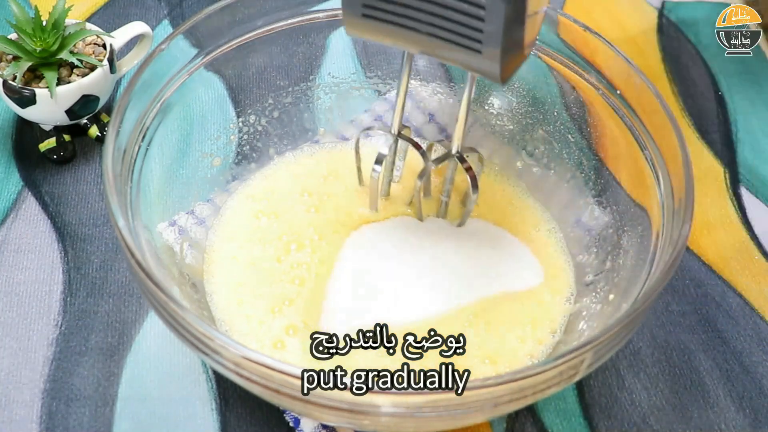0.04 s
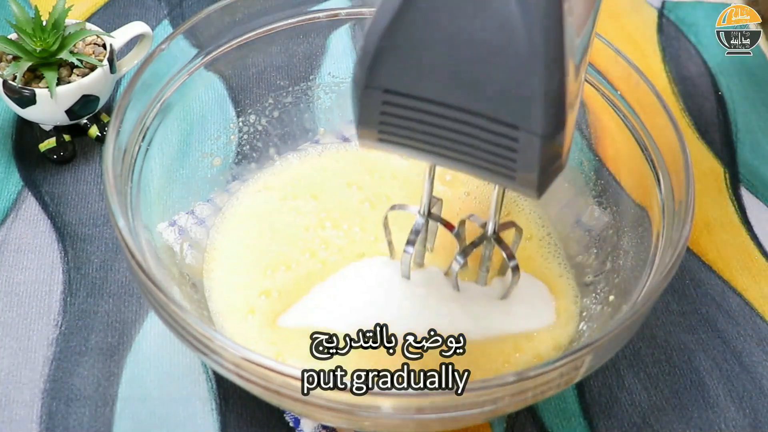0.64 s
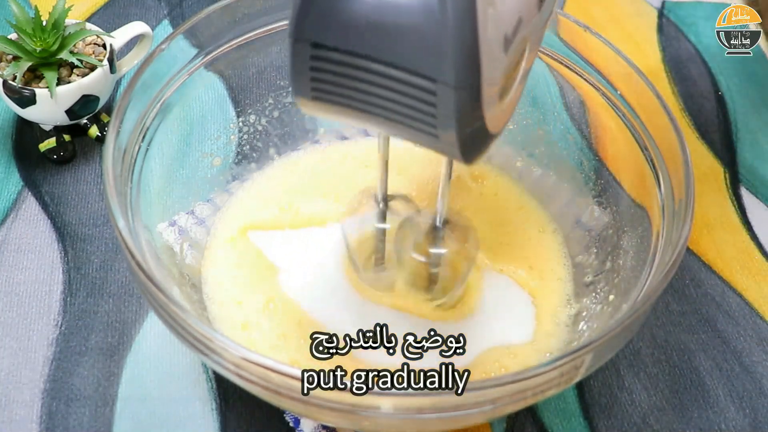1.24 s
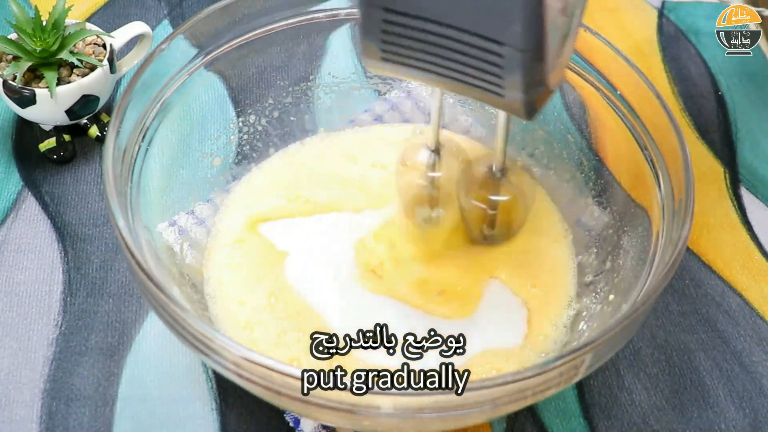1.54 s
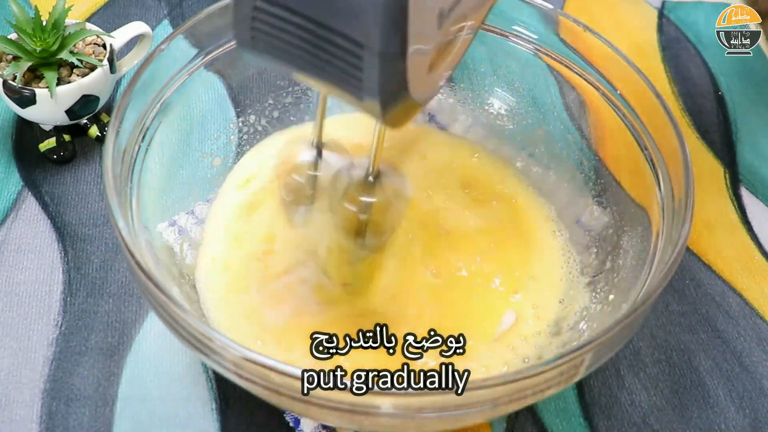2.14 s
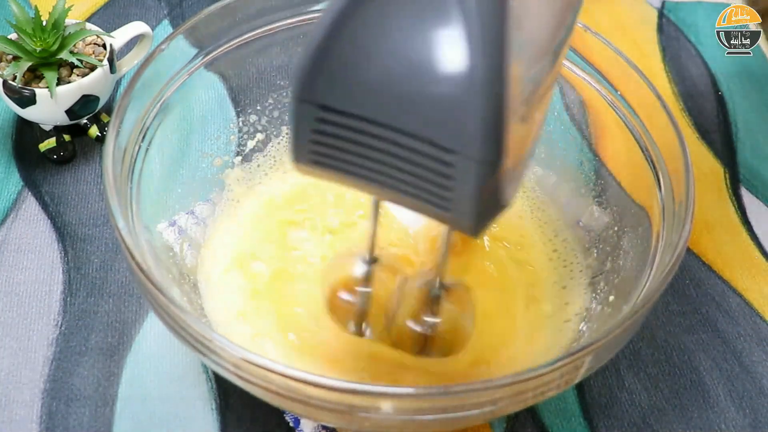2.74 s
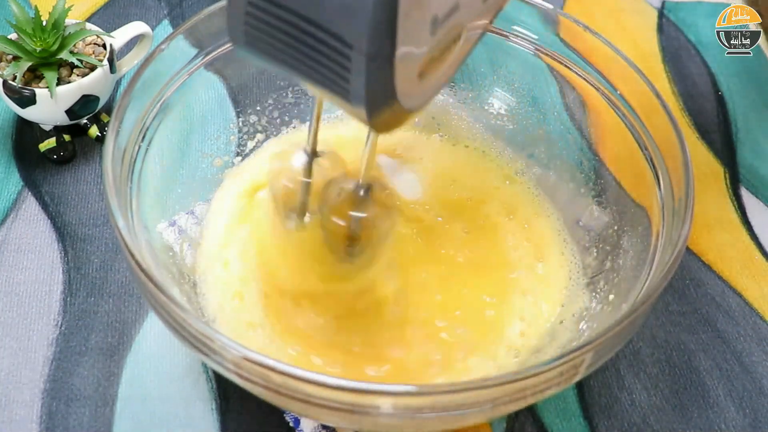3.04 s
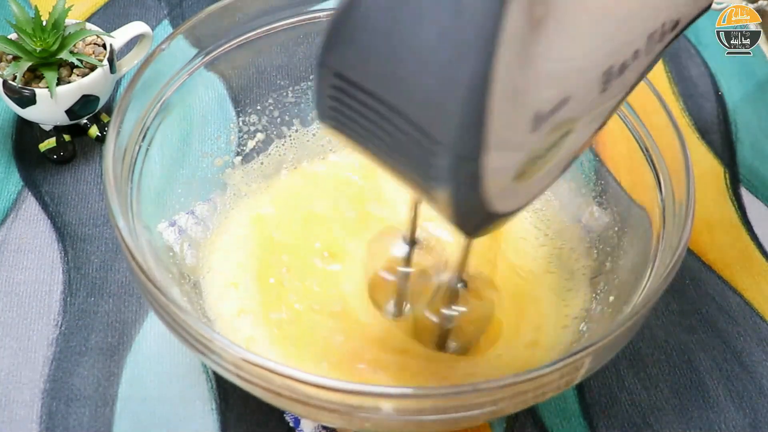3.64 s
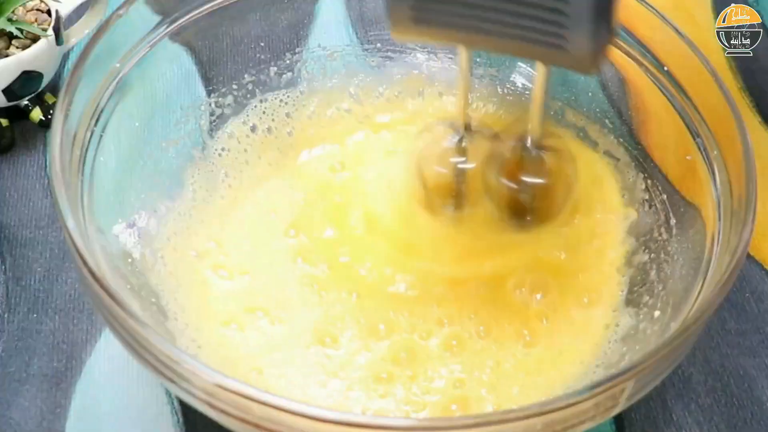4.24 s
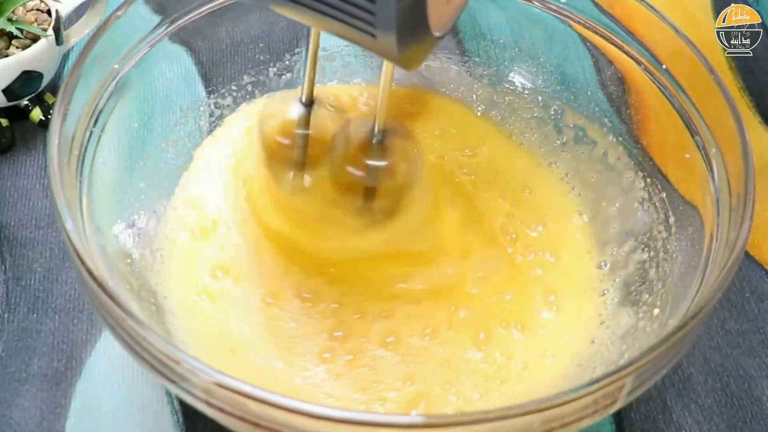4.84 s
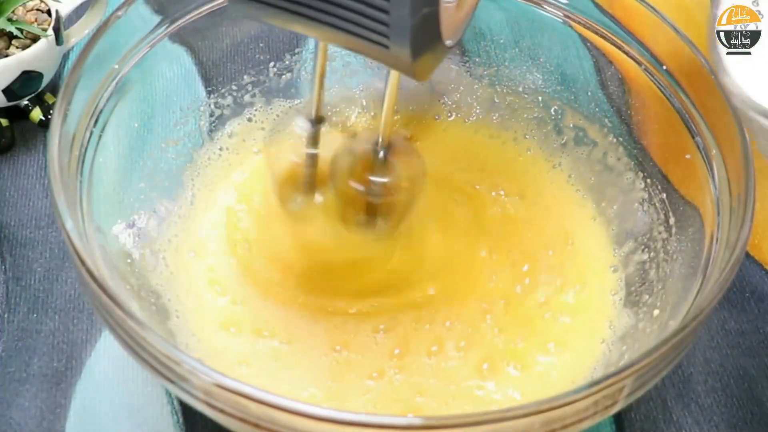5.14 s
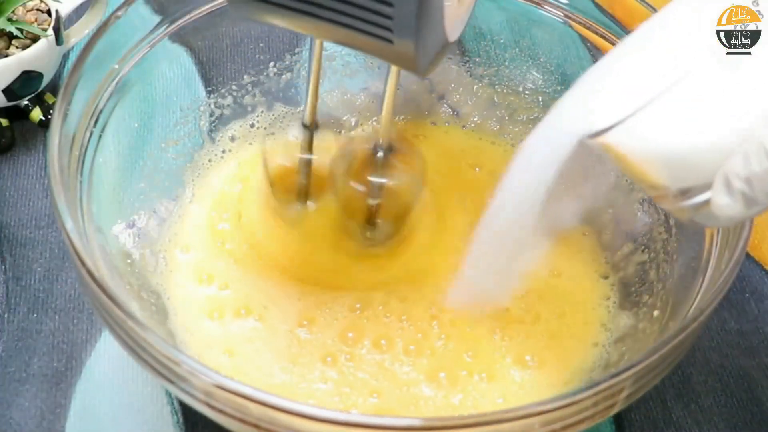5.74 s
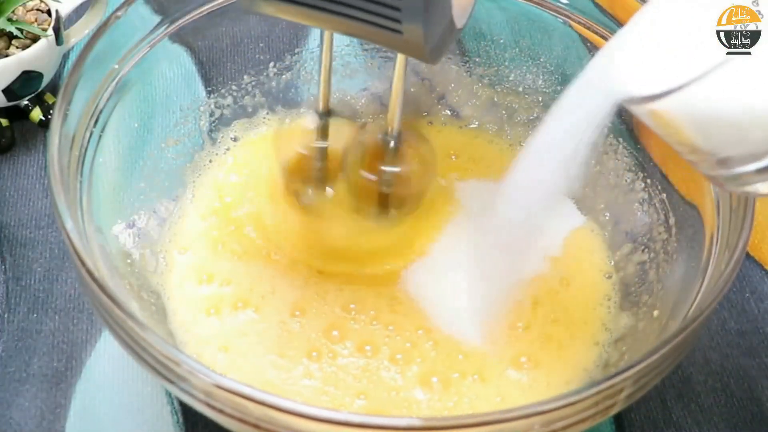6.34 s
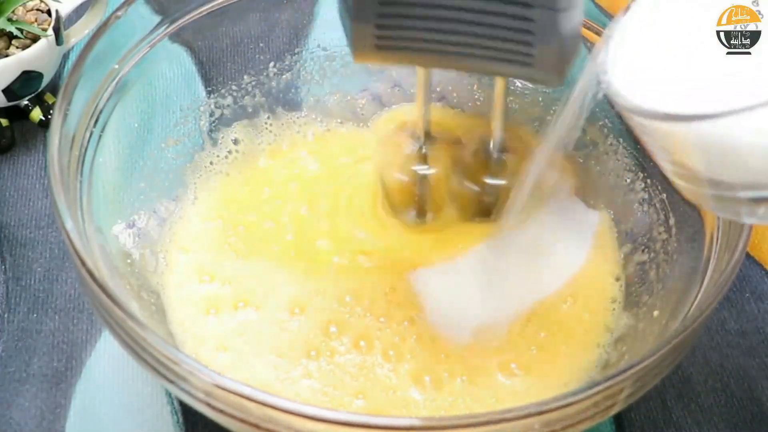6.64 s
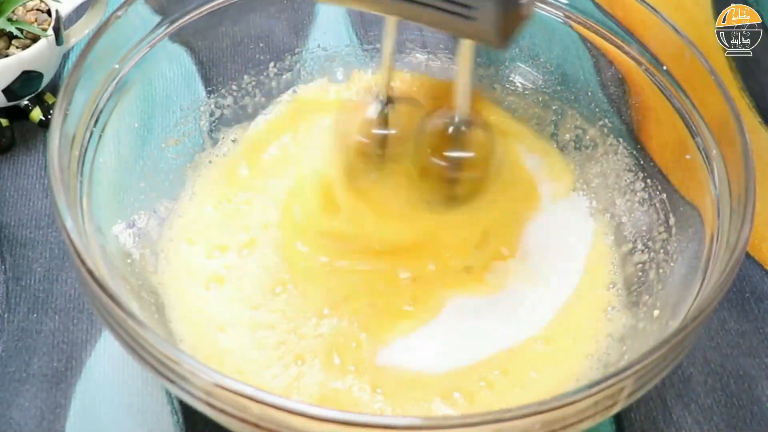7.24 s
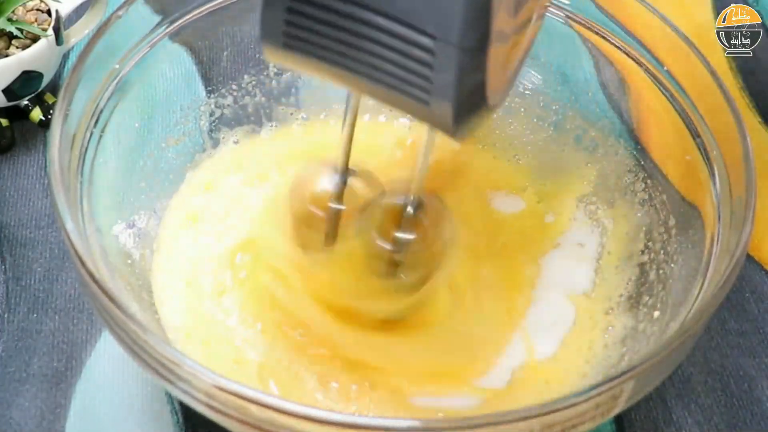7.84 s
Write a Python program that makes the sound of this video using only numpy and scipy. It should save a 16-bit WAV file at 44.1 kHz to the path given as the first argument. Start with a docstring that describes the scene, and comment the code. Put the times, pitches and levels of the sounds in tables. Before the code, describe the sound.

For the first second, a hand makes faint bumps and small clicks on the plastic grip of an electric hand mixer. At about 1.1 seconds the switch snaps on, and the motor growls and rises in pitch, reaching full speed by about 2 seconds. It then runs steadily to the end at around 8 seconds, a whine and hum over rattling gears, with a light spatter of eggs and sugar. The tone wavers slightly as the beaters circle the glass bowl. A light knock comes at 3.6 seconds. From 4.2 to 5 seconds the steel beaters scrape and knock the glass in quick, louder clusters. Another knock follows at 5.7 seconds, a few softer ones between 6.1 and 6.4, and two more near 7.5. The sound is close, with the short echo of a small, quiet kitchen.

```python
"""Hand mixer in a glass bowl.

A hand bumps and clicks on the plastic grip, then the switch snaps on. The motor growls and whines
up to speed, its gears rattle in the housing and the beaters spatter eggs and sugar.
Now and then the steel blades graze or knock the glass. A small kitchen adds a short tail."""
import sys
import numpy as np
from scipy import signal
from scipy.fft import rfft, irfft
from scipy.io import wavfile
from scipy.ndimage import uniform_filter1d

SR = 44100
rng = np.random.default_rng(int(sys.argv[2]) if len(sys.argv) > 2 else 0)


def inscribe(sig):
    """Save sig as 16-bit PCM at rate SR to the path in sys.argv[1].

    A 1-D sig is mono; a 2-D sig holds one channel per row.
    Samples are clipped to [-1, 1] before scaling.
    """
    pcm = np.round(np.clip(np.atleast_2d(sig).T, -1, 1) * 32767)
    wavfile.write(sys.argv[1], SR, pcm.astype(np.int16))


N = 357210
TIME = np.arange(N) / SR
FREQS_HZ = np.fft.rfftfreq(8192, 1 / SR)

# still kitchen: freq_hz, gain_db
ROOM_EQ = [(30, -9), (55, -3), (100, -5), (300, -9), (520, -15), (660, 11), (800, -16), (1700, -13),
           (3000, -17), (5000, -28), (15000, -30)]
# wall reflections: freq_hz, gain_db
WALL_EQ = [(400, -9), (780, -7), (1200, -1), (3000, -1.5), (12000, -9.0)]

# palm on the casing: start_s, peak_db, pitch_hz, rattle_db
BUMPS = [(0.003, -56, 630, -10), (0.036, -60, 395, -14), (0.170, -53, 457, -13), (0.190, -47, 593, -10),
         (0.234, -55, 646, -7), (0.247, -60, 567, -16), (0.263, -62, 500, -2), (0.360, -62, 620, -11),
         (0.386, -56, 500, -14), (0.766, -50, 683, -11)]
# hollow casing: freq_hz, gain_db
CASING_EQ = [(80, -24), (260, -2), (650, 0), (900, -15), (3000, -39)]
# grip and switch: start_s, level_db, bass_db, treble_db, spot_hz
CLICKS = [(0.037, -46, -17, -16, 2750), (0.194, -47, -17, -26, 3150), (0.528, -49.5, -30, -40, 1050),
          (0.675, -40.5, -52, -28, 1800), (0.683, -40, -47, -15, 1000), (0.791, -38, -40, -31, 2100),
          (0.862, -31, -42, -14, 1750), (0.913, -32, -33, -18, 1800), (1.003, -31.5, -48, -13, 1700),
          (1.116, -34, -29.5, -10, 2230), (1.128, -13, -40.5, -4.5, 1910)]
# tapped plastic grip: freq_hz, gain_db
GRIP_EQ = [(60, -35), (200, -21), (400, -18), (640, 1.5), (830, -4), (1400, -4), (1900, 1.5), (2500, -2),
           (3200, -4), (4200, -10), (8000, -17.5), (15000, -38)]
# grip cavities: freq_hz, width_hz, gain_db
GRIP_MODES = [(409, 80, 3), (680, 55, 9.5), (1070, 100, 9), (1680, 150, 4), (2020, 80, 1), (3060, 350, 6)]

# shaft speed under batter drag, before spin-up scaling: time_s, speed_hz
SHAFT_SPEED = [(2.7, 391.2), (3.35, 386.7), (3.85, 390.4), (4.2, 384.4), (4.35, 381), (4.65, 384.2),
               (4.9, 383.3), (5.0, 383), (5.45, 381.4), (5.75, 384), (6.75, 382.3), (7.65, 378.6),
               (8.1, 379)]
# imbalance hum as the mixer tilts: time_s, level_db
HUM_LEVEL = [(1.9, -42.5), (2.15, -44), (2.4, -37.5), (2.55, -37), (3.25, -40.5), (3.35, -38), (4.2, -42.5),
             (4.8, -43.5), (5.05, -43.5), (5.3, -40), (6.1, -43.5), (6.6, -39), (7.05, -45.5), (7.5, -39),
             (7.8, -51.5), (8.1, -41)]
# twelve armature slots: shaft_order, level_db
SLOT_TONES = [(12, 2.5), (24, -6), (36, -13)]
# slot whine as the mixer moves: time_s, level_db
WHINE_LEVEL = [(1.85, -56), (2.02, -47.5), (2.22, -44), (2.35, -55), (2.6, -43), (2.71, -50), (2.96, -45),
               (3.19, -52), (3.38, -45), (3.8, -47), (3.94, -54), (4.05, -50), (4.3, -51), (4.75, -47),
               (5.08, -55), (5.28, -47), (5.43, -58), (5.67, -54), (6.05, -49.5), (6.48, -59), (6.8, -49),
               (7.08, -44), (7.22, -49), (7.35, -47), (7.61, -56), (7.8, -49), (8.1, -53)]
# whine path through the stator: freq_hz, gain_db
STATOR_EQ = [(60, -30), (300, -2), (650, 10), (900, 12), (1200, 17), (1550, 14), (2000, 16.5), (2300, 11),
             (2550, 4), (2850, 21), (3200, 14), (3500, -4), (4300, -14), (4520, 0), (4750, 0), (5200, -20)]
# brushes on the commutator: shaft_order, level_db
BRUSH_TONES = [(24, -53.5), (36, -63)]
# whistle path through the vents: freq_hz, gain_db
VENT_EQ = [(60, -60), (4000, -35), (5000, -2), (7300, 0), (7900, -8), (8600, -1), (9300, -1), (10300, -13),
           (11000, 0), (12500, 2), (13900, -3)]
# casing under inrush current: freq_hz, gain_db
GROWL_EQ = [(80, -54), (350, -30), (600, -8), (900, -1), (3000, -13), (6000, -45)]
# rotor and fan: shaft_order, level_db
ROTOR_TONES = [(2, -43.5), (3, -55), (4, -49.5), (5, -56.5), (6, -55), (8, -56), (9, -44.5), (18, -50.5),
               (20, -52), (21, -50)]
# beater effort: time_s, rattle_db, relative_treble_db
EFFORT = [(1.7, -25, -11.5), (1.8, -26.0, -12), (2.1, -24.0, -11), (4.05, -24, -11.5), (4.3, -23, -12),
          (4.85, -24.5, -9), (5.0, -23, -11), (5.3, -23.5, -11), (5.7, -23, -11.5), (5.85, -25.5, -10),
          (6.35, -23.0, -11.5), (6.6, -25.5, -8.5), (7.45, -23.5, -11), (8.1, -25, -9.5)]
# mixer housing: freq_hz, gain_db
HOUSING_EQ = [(30, -39), (100, -43), (150, -25.5), (250, -13), (450, -6), (900, -4.5), (1350, -6),
              (1900, -4), (3100, -6.5), (3650, -17.5), (4200, -24), (5500, -16), (9000, -15), (11000, -24),
              (15500, -32.5)]
# housing and bowl resonances: freq_hz, width_hz, gain_db
HOUSING_MODES = [(218, 97, 5.5), (442, 37, 3.5), (546.6, 26, 6), (648, 117, 8), (815, 62, 4),
                 (1035, 49, 8.5), (1596, 72, 6.5), (1866, 230, 4.5), (2060, 63, -7), (2270, 190, 1.5),
                 (2793, 180, 4.5), (3054, 177, 6.5), (5220, 1160, 5.5), (5830, 440, -5), (6350, 300, 0.5),
                 (7900, 400, 0), (9600, 300, 1.5), (10350, 250, 2), (10800, 400, -1), (12150, 300, 3.5)]
# batter drops: freq_hz, gain_db
SPATTER_EQ = [(200, -59), (700, -7.0), (2800, -17), (4200, -36.5), (8000, -20), (15000, -40)]
# rotor overtones crossing a housing resonance: shaft_order, level_db
SWEEP_TONES = [(8, -26.5), (9, -31.5)]

# beaters passing the bowl's near side: middle_s, level_db
PASSES = [(2.05, -7), (2.9, -5), (3.8, -9), (4.55, -7), (7.02, -2), (7.78, -3.5)]
# near-side resonances: freq_hz, width_hz, level_db
NEAR_BANDS = [(655, 67, -38.5), (2060, 98, -32.5), (2620, 120, -32)]
# far-side resonances, and the brushes' hiss near 9.3 kHz while the mixer rests:
# freq_hz, width_hz, level_db
FAR_BANDS = [(990, 43, -59), (1568, 99, -39), (2780, 28, -38), (9310, 230, -45.5), (11400, 200, -59),
             (12130, 330, -58), (13060, 180, -63)]
# blades grazing the glass: middle_s, length_s, level_db
SCRAPES = [(3.569, 0.13, -44), (4.267, 0.51, -31.5), (4.98, 0.25, -35.5), (6.33, .25, -45)]
# steel ticks: freq_hz, gain_db
STEEL_EQ = [(3000, -40), (6000, -15), (7800, 5), (10000, -8), (15000, -24)]
# filled glass bowl with beaters: freq_hz, gain_db, t60_s
BOWL_MODES = [(455, 13.5, 0.046), (650, 13, 0.044), (1056, 10.5, 0.065), (1570, 1, 0.078),
              (1890, 5.5, 0.083), (2275, 1, .05), (2910, 9, 0.071), (7550, 4.5, 0.026)]
# blades striking the glass: start_s, level_db, treble_db, spot_hz
KNOCKS = [(3.569, -19, -32, 650), (4.189, -12, -16, 2900), (4.22, -12, -19, 650), (4.256, -8, -14, 2900),
          (4.311, -9.5, -13, 2900), (4.364, -6, -15, 2400), (4.417, -15, -16, 460), (4.666, -17, -18, 1900),
          (4.927, -8.5, -20, 1900), (4.982, -6, -20, 2900), (5.034, -9.5, -30, 1050),
          (5.671, -13, -18, 1044), (6.131, -13, -33, 1555), (6.24, -22, -24, 1900), (6.34, -15, -24, 460),
          (6.42, -17.5, -24, 1560), (7.445, -5.5, -25, 1050), (7.513, -13, -16, 2900)]

MAINS_HZ, TOP_HZ = 50, 15700
POWER_ON_S, ROTOR_START_S = 1.13, 1.14
REST_S, REST_LENGTH_S = 5.97, 2.3  # middle and length of the rest at the bowl's far side


def undb(db):
    """Decibels to gain."""
    return 10 ** (np.asarray(db) / 20)


def unit(x):
    """Scale to rms 1."""
    return x / np.sqrt(np.mean(x ** 2))


def curves(table):
    """Each column, interpolated over time."""
    time_s, *columns = np.transpose(table)
    return [np.interp(TIME, time_s, column) for column in columns]


def walk(rate_hz):
    """Smooth random drift, rms 1."""
    step = max(int(SR / rate_hz), 1)
    held = np.repeat(rng.standard_normal(N // step + 1), step)
    return unit(uniform_filter1d(held, step)[:N])


def colour(x, eq, peaks=()):
    """Minimum-phase filter: broad outline plus resonant peaks."""
    hz, db = np.transpose(eq)
    gain_db = np.interp(np.log(FREQS_HZ + 1), np.log(hz), db)
    for centre_hz, width_hz, lift_db in peaks:
        gain_db = gain_db + lift_db / (1 + (2 * (FREQS_HZ - centre_hz) / width_hz) ** 2)
    cepstrum = irfft(np.log(undb(gain_db)))
    half = len(cepstrum) // 2
    cepstrum[1:half] *= 2
    cepstrum[half + 1:] = 0
    return signal.fftconvolve(x, irfft(np.exp(rfft(cepstrum))))[:len(x)]


def band(x, hz, kind):
    """Low-pass or high-pass."""
    return signal.sosfilt(signal.butter(4, hz, kind, fs=SR, output="sos"), x)


def resonate(x, hz, width_hz):
    """Narrow band-pass."""
    edges_hz = [hz - width_hz / 2, hz + width_hz / 2]
    return signal.sosfilt(signal.butter(2, edges_hz, "band", fs=SR, output="sos"), x)


def fade(t, t60_s):
    """Exponential decay."""
    return np.exp(-np.log(1000) * t / t60_s)


def impacts(rate_hz, spread_db):
    """Random impulses of uneven size, rms 1."""
    hits = (rng.random(N) < rate_hz / SR) * rng.choice([-1, 1], N)
    return unit(hits * undb(spread_db * np.minimum(rng.standard_normal(N), 2)))


def add(out, start_s, sound):
    """Mix a sound in at start_s."""
    i = max(int(start_s * SR), 0)
    out[i:i + len(sound)] += sound[:N - i]


def swell(middle_s, length_s):
    """Smooth rise, hold and fall, 0 to 1."""
    out = np.zeros(N)
    add(out, middle_s - length_s / 2, signal.windows.tukey(int(length_s * SR), .7))
    return out


def tones(partials, turns, waver_db):
    """Shaft-locked partials, each wavering as the mixer moves."""
    return sum(np.sqrt(2) * undb(db + waver_db * walk(8.1))
               * np.sin(2 * np.pi * (order * turns + rng.random())) for order, db in partials)


def bumps():
    """Palm on the hollow casing: slow push, one low ring, some plastic rattle."""
    out, t = np.zeros(N), TIME[:SR // 4]
    for start_s, peak_db, pitch_hz, rattle_db in BUMPS:
        push = np.minimum(t / .005, 1) ** 2 * (fade(t, 0.039) + undb(-20) * fade(t, .25))
        noise = rng.standard_normal(len(t))
        hollow = np.sin(2 * np.pi * pitch_hz * t) + undb(-12) * unit(colour(noise, CASING_EQ))
        rattle = unit(band(colour(noise, GRIP_EQ, GRIP_MODES), 3400, "low"))
        bump = push * (hollow + undb(rattle_db) * rattle)
        add(out, start_s, undb(peak_db) * bump / np.abs(bump).max())
    return out


def clicks():
    """Fingers shift on the grip, then the switch snaps; each spot has its own resonance."""
    out, t = np.zeros(N), TIME[:SR // 3]
    decay = fade(t, 0.016) + undb(-21.5) * fade(t, 0.3)
    for start_s, level_db, bass_db, treble_db, spot_hz in CLICKS:
        contact_s = 0.0016 * undb(-.3 * min(treble_db + 5.0, 0))  # soft fingers press in slowly
        push = rng.standard_normal(len(t)) * decay * np.minimum(t / contact_s, 1)
        ring = colour(push, GRIP_EQ, GRIP_MODES + [(spot_hz, 300, 6)])
        thud, tick = unit(band(ring, 460, "low")), unit(band(ring, 4800, "high"))
        body = unit(band(band(ring, 620, "high"), 3100, "low"))
        click = body + undb(bass_db + 15) * thud + undb(treble_db - 1.0) * tick
        add(out, start_s, undb(level_db - 2.5) * click / np.abs(click).max())
    return out


def spin_up(kick_share=.085, kick_s=.035, rise_s=.241):
    """Share of full speed: quick inrush kick, then a slower exponential approach."""
    t = np.maximum(TIME - ROTOR_START_S, 0)
    return 1 - kick_share * np.exp(-t / kick_s) - (1 - kick_share) * np.exp(-t / rise_s)


def shaft(shaft_hz, jitter):
    """Accumulated turns of the shaft, trembling in its bearings."""
    return np.cumsum(shaft_hz * (1 + 0.000786 * walk(14) + jitter * walk(400))) / SR


def motor(shaft_hz, turns, ripple, inrush):
    """Imbalance hums, slots whine, brushes whistle; inrush roughens the last two and adds a growl."""
    hum_db, whine_db = curves(HUM_LEVEL)[0], curves(WHINE_LEVEL)[0]
    speed = shaft_hz / shaft_hz.max()
    hum = tones([(1, 2)], turns, waver_db=1.2) * undb(hum_db) * speed ** 5

    shudder = (1 + (0.3 + 0.68 * inrush) * ripple) * undb(1.2 * inrush * walk(300))
    judder_turns = .008 * inrush * walk(500)  # a slow rotor steps unevenly from slot to slot
    slots = tones(SLOT_TONES, turns + judder_turns, waver_db=1.15) * shudder
    whine = colour(slots, STATOR_EQ) * undb(whine_db + 8 * inrush) * np.minimum(speed / 0.24, 1)

    brushes = tones(BRUSH_TONES, shaft(shaft_hz, jitter=.0045 + .014 * inrush), waver_db=1.5)
    whistle_db = 10.5 * np.sqrt(inrush) + 4.5 * swell(REST_S, REST_LENGTH_S)
    whistle = colour(brushes, VENT_EQ) * shudder * undb(whistle_db) * speed ** 2

    buzz = rng.standard_normal(N) * (1 + 0.71 * ripple)
    growl = unit(colour(buzz, GROWL_EQ, peaks=[(706, 120, 22)])) * undb(-31) * inrush ** 10
    return hum + whine + whistle + growl


def gear_rattle(level_db):
    """Teeth clatter: dense impacts plus noise, with a flickering level."""
    load = undb(level_db + 0.5 * walk(70))
    return 0.58 * (impacts(rate_hz=1900, spread_db=0.5) + rng.standard_normal(N)) * load


def housing(vibration, treble_db):
    """The plastic shell radiates the vibration; the treble has its own level."""
    body = colour(vibration, HOUSING_EQ, HOUSING_MODES) * undb(9.5)
    return band(body, 4040, "low") + band(body, 3520, "high") * undb(treble_db + 11)


def gear_rasp(level_db, flare_db=6.5):
    """Teeth bite unevenly: narrow-band noise flares in short pulses."""
    rasp = unit(resonate(rng.standard_normal(N), hz=3042, width_hz=260))
    return rasp * undb(level_db + flare_db * np.tanh(walk(60)))


def spatter(level_db):
    """The beaters flick drops of batter."""
    return colour(impacts(rate_hz=180, spread_db=4), SPATTER_EQ) * undb(level_db)


def rotor_sweep(turns, inrush):
    """Rotor overtones climb through a housing resonance during spin-up."""
    return resonate(tones(SWEEP_TONES, turns, waver_db=1.0), hz=2820, width_hz=150) * inrush ** 0.32


def circling(pass_s=0.42):
    """Noise bands swell with position: resonances on near passes, others plus brush hiss at rest."""
    near = sum(undb(db) * swell(middle_s, pass_s) for middle_s, db in PASSES)
    far = swell(REST_S, REST_LENGTH_S)
    return sum(presence * undb(db) * unit(resonate(rng.standard_normal(N), hz, width_hz))
               for presence, bands in [(near, NEAR_BANDS), (far, FAR_BANDS)]
               for hz, width_hz, db in bands)


def mixer(gear_ratio=20):
    """The motor drives the beaters through a worm gear; the rattle gains level and treble with speed."""
    speed = spin_up()
    shaft_hz = speed * curves(SHAFT_SPEED)[0]
    turns = shaft(shaft_hz, jitter=0.0019)
    power = np.clip((TIME - POWER_ON_S) / 0.0035, 0, 1)
    ripple = np.cos(4 * np.pi * MAINS_HZ * TIME)  # two torque pulses per mains cycle
    inrush = np.clip(1 - speed ** 2, 0, 1)  # extra current drawn by the slow motor

    effort_db, brightness_db = curves(EFFORT)
    take_up = swell(middle_s=1.203, length_s=0.072)  # the teeth take up their play
    rattle_db = effort_db - 23.5 * inrush ** 3.73 + 4.5 * take_up
    treble_db = brightness_db - 7 * inrush + 11 * take_up

    rotor = tones(ROTOR_TONES, turns, waver_db=1.0) * speed ** 4 * (1 + 0.34 * ripple)
    beater_load = np.cos(2 * np.pi * turns / gear_ratio + 2.6 * walk(4.4))
    gears = gear_rattle(rattle_db + 0.22 * beater_load + (4.4 * inrush - 1) * ripple)
    sound = housing(gears + rotor, treble_db)
    sound += spatter(rattle_db + 2 * beater_load + 1) * speed ** 2
    sound += rotor_sweep(turns, inrush)
    sound += gear_rasp(rattle_db + 2 * beater_load - 16.5)
    return power * (sound + motor(shaft_hz, turns, ripple, inrush) + circling())


def scrapes():
    """Grazing blades tap the glass rapidly: bowl rings, steel ticks, worktop rumbles."""
    t = TIME[:SR // 5]
    ring = sum(undb(db) * fade(t, t60_s) * np.sin(2 * np.pi * hz * t) for hz, db, t60_s in BOWL_MODES)
    contact = sum(undb(db) * swell(middle_s, length_s) for middle_s, length_s, db in SCRAPES)
    taps = impacts(rate_hz=400, spread_db=2.0)
    bowl = unit(band(signal.fftconvolve(taps, ring)[:N], 290, "high"))
    noise = rng.standard_normal(N)
    bursts = signal.fftconvolve(np.abs(impacts(rate_hz=120, spread_db=3)), fade(t, 0.013))[:N]
    ticks = unit(colour(noise * bursts, STEEL_EQ))
    rumble = unit(band(rng.standard_normal(N), 65, "low"))
    return contact * (bowl + undb(-13) * ticks + undb(-38) * rumble)


def knocks():
    """A blade strikes the glass and skips once: short cracks, ring damped by the batter."""
    out, t = np.zeros(N), TIME[:SR // 5]
    for start_s, level_db, treble_db, spot_hz in KNOCKS:
        # the struck spot favours modes near its own pitch
        modes = [(hz, db + 6 * np.exp(-(np.log2(hz / spot_hz) / .4) ** 2), t60_s)
                 for hz, db, t60_s in BOWL_MODES]
        crack_eq = [(100, -30), (400, 3), (1200, 8.5), (3000, treble_db + 22.5), (4200, treble_db),
                    (7500, treble_db + 10.5), (10500, treble_db + 5), (15000, treble_db - 17)]
        for lag_s, hit_db in [(0, -3.5), (rng.uniform(.003, .009), -8)]:
            ring = sum(undb(db + 2 * rng.standard_normal()) * fade(t, t60_s)
                       * np.sin(2 * np.pi * (hz * rng.normal(1, 0.0082) * t + rng.random()))
                       for hz, db, t60_s in modes)
            crack = colour(rng.standard_normal(len(t)) * fade(t, 0.038), crack_eq)
            body = band(unit(ring) + undb(-2.0) * unit(crack), 255, "high")
            steel_tick = unit(band(rng.standard_normal(len(t)), 6000, "high")) * fade(t, .012)
            knock = body / np.abs(body).max() + undb(treble_db - 0.5) * band(steel_tick, 11000, "low")
            add(out, start_s + lag_s, undb(level_db + hit_db) * knock)
    return out


def kitchen(x, t60_s, wet_db):
    """Hard walls and worktop return a short, mid-heavy tail."""
    t = TIME[:SR // 2]
    tail = colour(rng.standard_normal(len(t)) * fade(t, t60_s) * (t > .004), WALL_EQ)
    return x + undb(wet_db) * signal.fftconvolve(x, tail / np.linalg.norm(tail))[:N]


def scene():
    """All worktop sources over the still room, mono."""
    room_tone = unit(colour(rng.standard_normal(N), ROOM_EQ)) * undb(-78.0)
    sources = mixer() + bumps() + clicks() + knocks() + scrapes()
    return (kitchen(sources, t60_s=.45, wet_db=-15) + room_tone)[None]


def record(dry):
    """Steep low-pass at TOP_HZ."""
    return signal.sosfilt(signal.ellip(10, .2, 70, TOP_HZ, fs=SR, output="sos"), dry)


dry = scene()
out = record(dry)
inscribe(out)
```